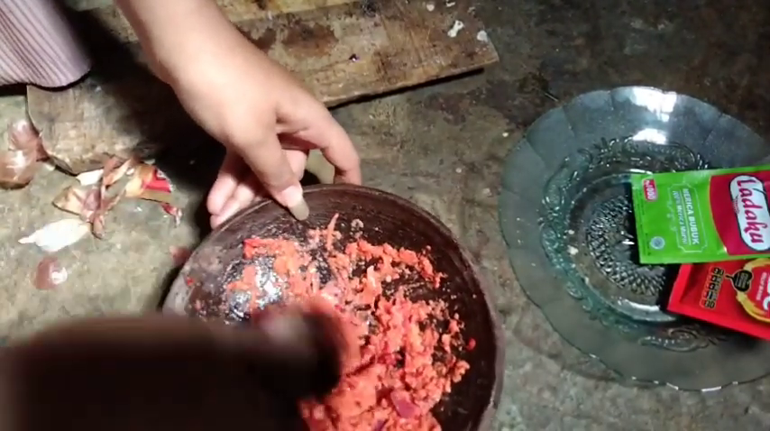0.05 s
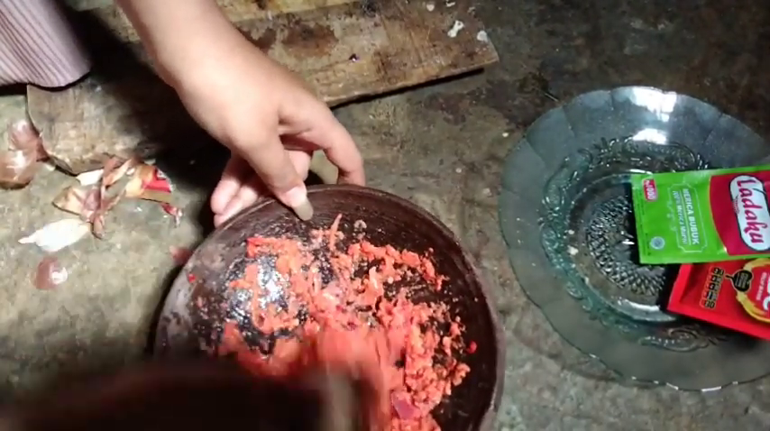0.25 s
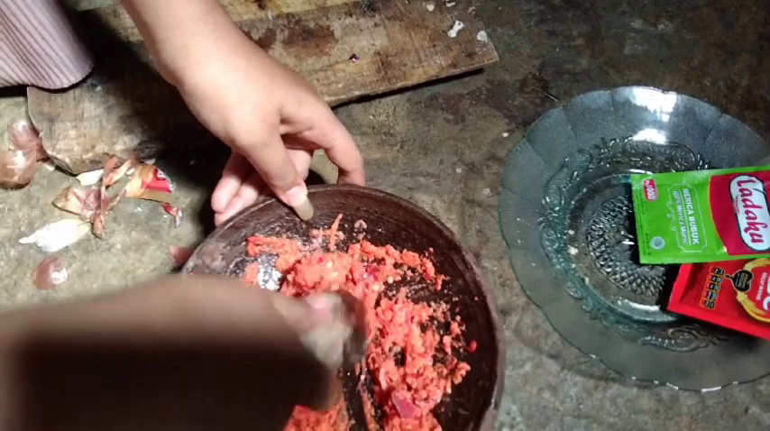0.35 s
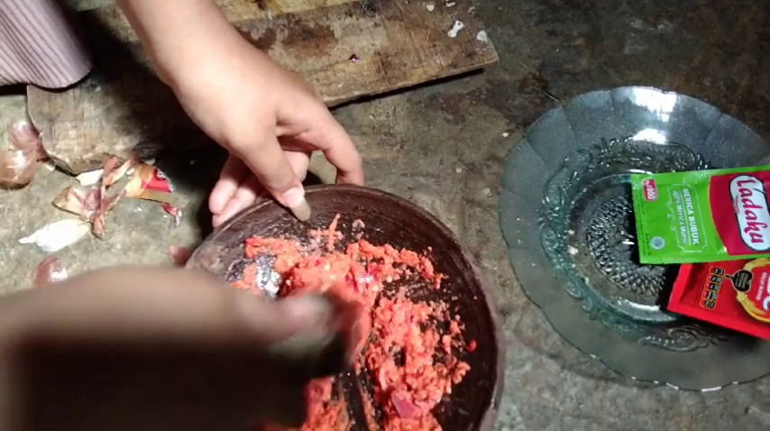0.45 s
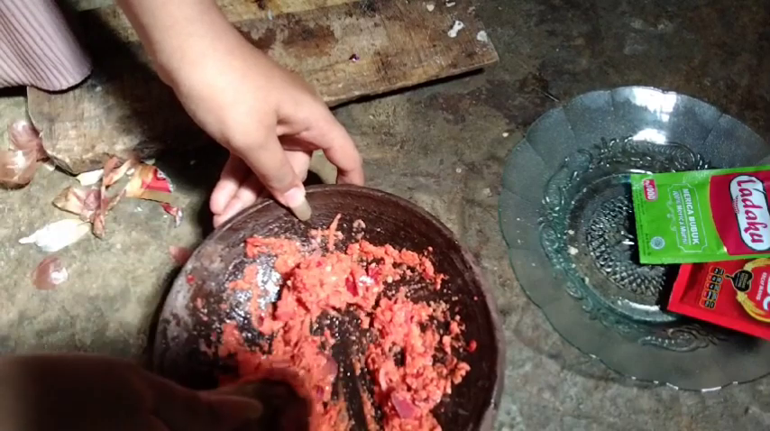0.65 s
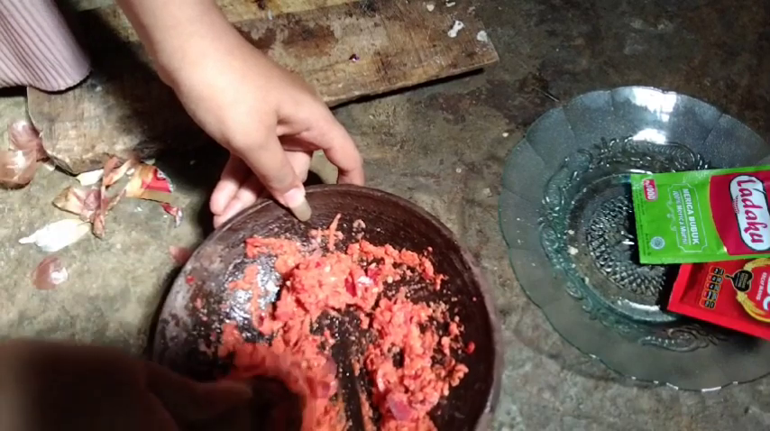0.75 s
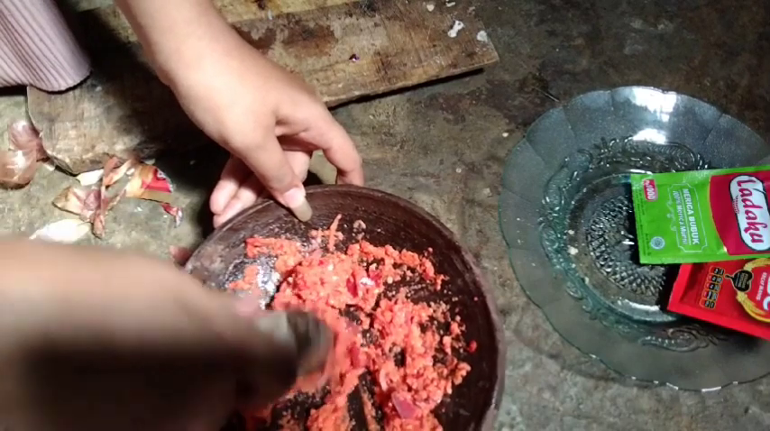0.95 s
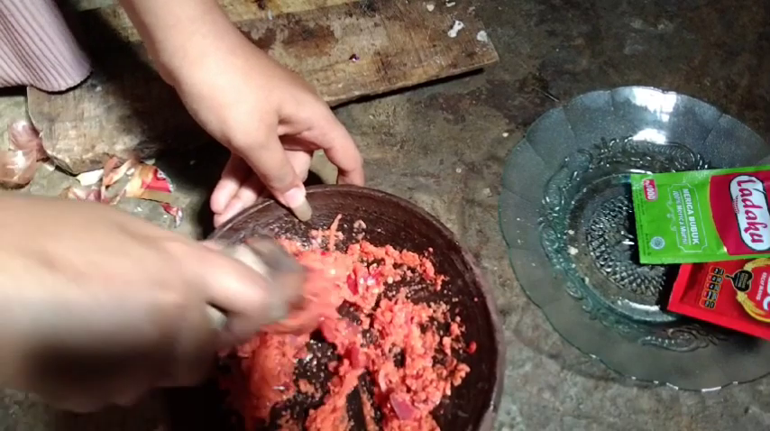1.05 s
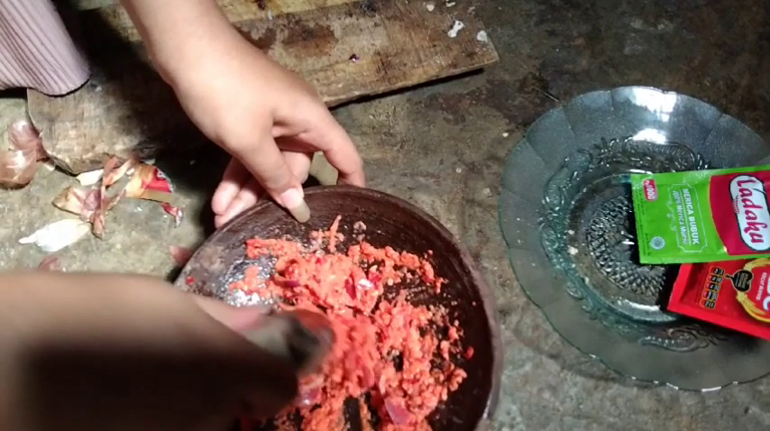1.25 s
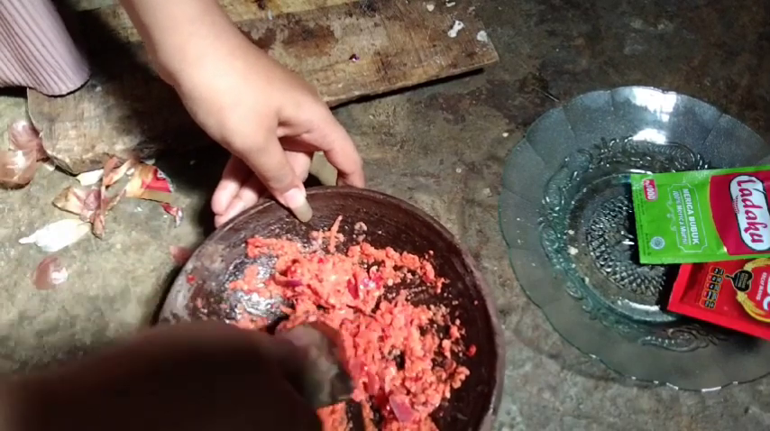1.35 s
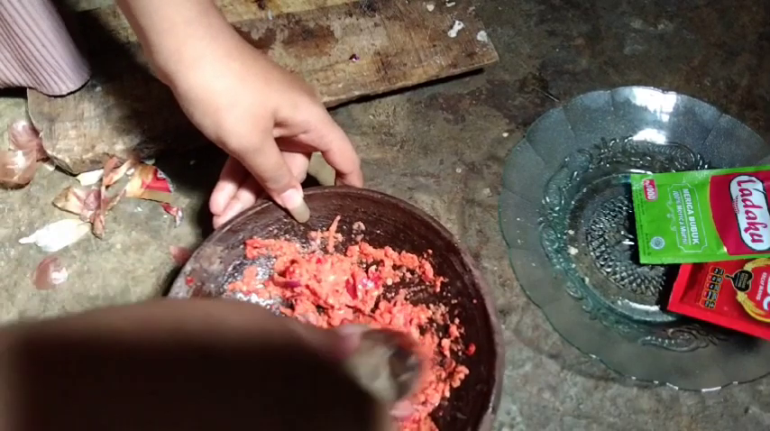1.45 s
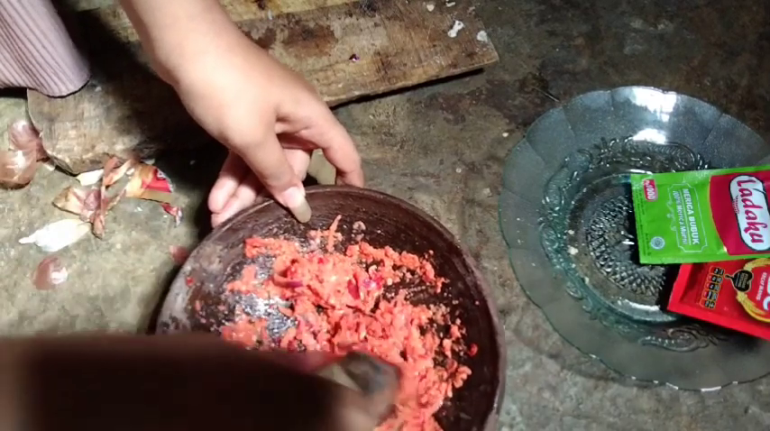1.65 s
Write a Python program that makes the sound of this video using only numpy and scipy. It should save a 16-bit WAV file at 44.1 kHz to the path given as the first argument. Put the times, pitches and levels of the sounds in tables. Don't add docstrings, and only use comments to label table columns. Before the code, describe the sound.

Stone pestle clacking, grinding and pounding in a mortar, close up, with short bare-room echoes

```python
import sys
import numpy as np
from scipy import signal
from scipy.fft import rfft, irfft, next_fast_len
from scipy.io import wavfile
from scipy.ndimage import uniform_filter1d, map_coordinates

SR = 44100
rng = np.random.default_rng(int(sys.argv[2]) if len(sys.argv) > 2 else 0)


def file_out(sig):
    cols = np.atleast_2d(sig).T
    lim = np.clip(cols, -1, 1)
    pcm = np.round(lim * 32767).astype(np.int16)
    wavfile.write(sys.argv[1], SR, pcm)


def ratio(d):
    e = np.asarray(d, float) / 20
    return 10 ** e


N = 74970


def unit(x):
    return x / np.sqrt(np.mean(x ** 2) + 1e-20)


def along(points, hz):
    point_hz, value = np.transpose(points)
    return np.interp(np.log(hz + 1), np.log(point_hz + 1), value)


def curves(rows):
    s, *columns = np.transpose(rows)
    return [np.interp(np.arange(N) / SR, s, column) for column in columns]


def filtered(x, response):
    size = next_fast_len(len(x) + 8192)
    return irfft(rfft(x, size) * response(np.fft.rfftfreq(size, 1 / SR)), size)[:len(x)]


def colored(x, colour):
    return unit(filtered(x, lambda f: ratio(along(colour, f))))


def body(peaks):
    return lambda f: sum(ratio(db) * (2j * f * width / (hz * hz - f * f + 2j * f * width)) ** 3
                         for hz, width, db in peaks)


def bands(peaks):
    poles = np.exp(1j * np.pi * np.array([[5], [7], [9], [11]]) / 8)
    return lambda f: sum(ratio(db) / np.prod(1j * (f * f - hz * hz) / ((f + 1) * width) - poles, axis=0)
                         for hz, width, db in peaks)


RING_RISE_S = 0.004


def ring(modes, db):
    t = np.arange(SR // 2) / SR
    scatter_db = 1.5 * rng.standard_normal(len(modes))
    turns = rng.random(len(modes))
    tones = np.zeros(len(t))
    for (hz, level_db, t60), own_db, turn in zip(modes, scatter_db, turns):
        tones += ratio(level_db + own_db - 60 * t / t60) * np.sin(2 * np.pi * (hz * t + turn))
    tones = tones * (1 - np.exp(-t / RING_RISE_S))
    return ratio(db) * tones / np.linalg.norm(tones)


# frequency in Hz, t60 in seconds.
WALLS = [(200, 0.31), (700, 0.43), (1500, 0.32), (3000, 0.3), (6000, 0.23), (12000, 0.19)]


def walls():
    gap_s, patch_db, bright_db_per_khz = 0.0017, 4.96, 0.208
    early_db, early_t60_s = -3, 0.05
    hz, t, noise = signal.stft(rng.standard_normal(SR // 2), SR, nperseg=128)
    hz = hz[:, None]
    patches = unit(uniform_filter1d(rng.standard_normal(noise.shape), size=5, axis=0))
    decay = ratio(-60 * t / along(WALLS, hz)) + ratio(early_db - 60 * t / early_t60_s)
    colour = ratio(patch_db * patches + bright_db_per_khz * hz / 1000)
    tail = signal.istft(noise * colour * decay, SR, nperseg=128)[1]
    return np.pad(tail / np.linalg.norm(tail), (round(gap_s * SR), 0))[:SR // 2]


def add(out, s, db, response, room_db, ringing=0):
    blow = ratio(room_db) * walls() + ringing
    blow[0] += 1
    piece = out[round(s * SR):][:len(blow)]
    piece += ratio(db) * filtered(blow, response)[:len(piece)]


def struck(blows, peaks, room_db, modes, ring_db):
    out = np.zeros(N)
    for s, db in blows:
        add(out, s, db, body(peaks), room_db, ring(modes, ring_db))
    return out


# frequency in Hz, level in dB per Hz.
AIR = [(25, -21), (170, -6), (560, -18), (850, -14.5), (1400, -16.5), (2000, -38), (8000, -38.5),
       (15800, -39.5)]
# time in seconds, gain in dB.
HUSH = [(0, 14), (.1, 3.5), (.2, -21), (.222, -29), (.228, 12), (1.7, 6)]


def air():
    hush_db, = curves(HUSH)
    return ratio(-75.5 + hush_db) * colored(rng.standard_normal(N), AIR)


# time in seconds, load in dB.
LOAD = [(0.0, -75), (0.022, -39), (0.212, -61.5), (0.246, -48), (0.284, -46), (0.378, -42), (0.426, -56.5),
        (0.762, -59), (0.794, -48.5), (1.112, -68), (1.144, -35.5), (1.386, -54.5), (1.4, -57),
        (1.486, -61), (1.534, -58), (1.594, -67), (1.624, -57.5), (1.7, -56.5)]
# frequency in Hz, width in Hz, level in dB.
FLOOR_BODY = [(100, 30, -8), (165, 22, 2), (218, 24, -3), (275, 24, -9), (332, 24, -8), (440, 50, -17)]


def floor_hum():
    load_db, = curves(LOAD)
    lumps = map_coordinates(rng.standard_normal(80), [np.arange(N) * 40 / SR])
    pushes = rng.standard_normal(N) * ratio(4 * lumps)
    return ratio(load_db - 11.5) * unit(filtered(pushes, body(FLOOR_BODY)))


# start in seconds, level in dB, frequency in Hz.
THUDS = [(0.018, 7.5, 205), (0.065, 3, 201), (0.102, -1.5, 221), (0.792, 1, 243), (0.889, -0.5, 221.4),
         (0.954, -2, 440), (1.025, -1, 274), (.325, 2, 186), (.35, 1, 269), (0.471, -1.5, 262),
         (1.201, -3, 148.2), (1.395, 0, 176.5), (1.51, -2.5, 173), (1.518, -3, 327.4), (1.545, -11, 324.6),
         (1.554, -5, 173), (1.618, -16, 172), (1.655, -15, 174)]


def thuds():
    out = np.zeros(N)
    for s, db, hz in THUDS:
        add(out, s, db, body([(hz, 22, 0)]), room_db=-10)
    return out


def settle():
    start_s, level_db, t60_s = 0.261, -36.5, 0.3
    from_hz, to_hz, glide_s = 760, 616, 0.042
    t = np.clip(np.arange(N) / SR - start_s, 0, None)
    cycles = to_hz * t + (from_hz - to_hz) * glide_s * (1 - np.exp(-t / glide_s))
    envelope = ratio(level_db - 60 * t / t60_s) * (1 - np.exp(-t / RING_RISE_S))
    return envelope * np.sin(2 * np.pi * cycles)


# start in seconds, peak in dB, frequency in Hz.
TICKS = [(.020, -46, 790), (0.019, -53, 2850), (0.03, -44, 1420), (0.2262, -25, 4700), (.412, -25.5, 1200),
         (.433, -57, 13500), (.459, -51.5, 14000), (.4705, -19.5, 3950), (0.777, -53, 12700),
         (.815, -56, 13000), (.835, -49, 2500), (0.839, -57, 14000), (0.968, -58, 10000), (.986, -43, 7000),
         (.986, -70, 12500), (1.013, -57, 12600), (1.02, -45, 3000), (1.027, -45, 7600),
         (1.031, -64, 12800), (1.051, -55, 3800), (1.082, -56, 2680), (1.083, -60, 6460),
         (1.088, -63, 14000), (1.003, -35.5, 6600), (1.003, -51, 13000), (1.015, -36, 6300),
         (1.023, -51.5, 13000), (1.026, -57, 12340), (1.103, -61.5, 12000), (1.127, -54.5, 7050),
         (1.1425, -30, 3830), (1.268, -42.5, 7400), (1.310, -24.5, 4320), (1.311, -27, 6700),
         (1.309, -41.5, 11600), (1.408, -44.5, 5630), (1.465, -45, 6700), (1.465, -48, 3834),
         (1.491, -65, 11720), (1.580, -38.5, 6820), (1.591, -40, 4800), (1.607, -41.5, 14000),
         (1.602, -31.5, 1960), (1.605, -32.5, 3070), (1.615, -40.5, 7390), (1.615, -47, 11200),
         (1.67, -58, 15040)]


def ticks():
    out = np.zeros(N)
    for s, db, hz in TICKS:
        add(out, s, db + 9, bands([(hz, hz / 3.2, 0)]), room_db=-3.5)
    return out


# start in seconds, level in dB.
ROCKS = [
    (0.2371, -32),
    (.2455, -29),
    (0.247, -9.5),
    (.2525, -31),
]
# frequency in Hz, width in Hz, level in dB.
ROCK_BODY = [(259, 280, 7.5), (686, 106, 27.5), (450, 60, 8), (1380, 57, 20), (1640, 250, 16),
             (2500, 580, 10), (7840, 5800, -17)]
# frequency in Hz, level in dB, t60 in seconds.
ROCK_MODES = [(415, -1, 0.17), (715.4, -6.5, 0.45), (751.5, 2, .1), (904, 0.5, .25), (1384, -12, .25)]


def rocks():
    return struck(ROCKS, ROCK_BODY, -7, ROCK_MODES, -23.5)


GRAIN_BANDS_HZ = 500 * 1.6 ** np.arange(8)


def grit():
    grains_per_s, spread_db, octaves = 200, 3.5, 0.45
    shape = (len(GRAIN_BANDS_HZ), N)
    hits = rng.random(shape) < grains_per_s / SR
    sizes = ratio(spread_db * rng.standard_normal(shape))
    trains = hits * sizes * np.sign(rng.standard_normal(shape))
    out = np.zeros(N)
    for train, hz in zip(trains, GRAIN_BANDS_HZ):
        out += filtered(train, lambda f: np.exp(-(np.log2((f + 1) / hz) / octaves) ** 2))
    return unit(out)


# time in seconds, pressure in dB, brightness in dB.
SCRAPE = [(0, -66.5, -26), (.1, -75.5, -7), (.218, -98.5, 8), (.226, -59, 8.5), (.3, -51.5, -9.5),
          (.36, -50.5, 0), (.46, -53, -39), (.48, -61.5, 2.5), (.6, -58, 3), (.82, -64, -12),
          (.87, -46.5, -4), (.93, -60.5, -2), (1.04, -65, -69.5), (1.14, -76, 12.5), (1.3, -60, -1.5),
          (1.57, -99, -3), (1.605, -73, 12), (1.7, -78, -12)]
# frequency in Hz, level in dB per Hz.
STONE = [(240, -33), (400, 1.5), (636, -6), (787, -14), (1280, 0), (1990, -8), (3290, 2), (4170, -8),
         (8000, -18), (10400, -53), (17600, -120)]
# frequency in Hz, level in dB per Hz.
FIZZ = [(3530, -16), (6000, -13.5), (8920, -24), (12600, -31.5), (14200, -27.5), (15800, -26.5)]


def scrape():
    pressure_db, bright_db = curves(SCRAPE)
    grains = grit()
    smooth = 1.1 * rng.standard_normal(N)
    room = unit(signal.fftconvolve(grains, walls())[:N])
    rub = unit(grains + smooth + room)
    return ratio(pressure_db) * (colored(rub, STONE) + ratio(bright_db - 1) * colored(rub, FIZZ))


# start in seconds, level in dB.
SKIDS = [(0.0198, -29), (0.2249, -26.5), (0.4706, -1), (0.4753, -5), (0.852, -21), (.858, -16),
         (0.868, -23), (0.881, -20), (.893, -34), (1.310, -18.5), (1.602, -33.5)]
# frequency in Hz, width in Hz, level in dB.
SKID_BODY = [(500, 1900, -12), (1480, 570, 2), (2484, 550, 8), (3000, 210, -1.5), (3950, 340, 3),
             (4900, 900, -18.5), (7300, 5100, -20.5), (10000, 4600, -32.5), (14000, 2800, -17.5)]


def skids():
    out = np.zeros(N)
    for s, db in SKIDS:
        add(out, s, db, body(SKID_BODY), room_db=-2.5)
    return out


# start in seconds, level in dB.
STRIKES = [
    (.3672, 8),
    (.3785, -0.5),
    (.3845, -5),
    (.4115, -6.5),
]
# frequency in Hz, width in Hz, level in dB.
STRIKE_BODY = [(246, 130, -12), (535, 156, -8), (926, 130, -2), (1390, 150, 4), (1644, 470, 4.5),
               (2500, 516, 5.5), (2840, 210, 6.5), (3515, 290, -5.5), (4660, 700, -13), (6160, 590, -18),
               (7430, 700, -18.5), (13000, 3400, -50.5)]
# frequency in Hz, level in dB, t60 in seconds.
STRIKE_MODES = [(845, -11.5, .2), (1200, -7.5, .12), (1335, -9, .09), (1860, -3, 0.11), (2121, -9.5, .15),
                (2509, -4.5, .12), (2642, -9.5, .15), (2676, 5, .14), (3008, -12, .11), (3365, -9, .2)]


def strikes():
    return struck(STRIKES, STRIKE_BODY, 0, STRIKE_MODES, -12)


# start in seconds, level in dB.
POUNDS = [
    (1.1448, -3.5),
    (1.1518, -19.5),
]
# frequency in Hz, width in Hz, level in dB.
POUND_BODY = [(200, 185, 8.5), (440, 85, 20), (866, 130, 17), (1066, 61, 22), (1420, 91, 17),
              (1673, 826, 19), (3834, 375, 15), (4800, 260, 13.5), (6100, 350, 6.5), (7400, 460, 3),
              (9230, 890, -4), (11800, 1800, -8), (14100, 2100, -9)]
# frequency in Hz, level in dB, t60 in seconds.
POUND_MODES = [(147.8, -4, 0.6), (221, -6, 0.02), (444, -19.5, 0.087), (710, 1.5, 0.37), (855, -6.5, 0.45),
               (1010, 2, .1), (1175, 10, .15), (1420, 2.5, .11), (1576, -16, 0.085), (1807, -3, 0.23),
               (2230, 8, .05)]


def pounds():
    return struck(POUNDS, POUND_BODY, -5.5, POUND_MODES, -18.5)


# start in seconds, peak in dB, ring in Hz, bowl in dB over ring, edge in dB over ring.
CLACKS = [(0.5186, -4, 3072, -19.5, -17.5), (0.618, -10.5, 2634, -12.5, -32.5),
          (0.6732, -12.5, 2880, -15, -21), (0.7035, -12.5, 3090, -19, -18.5),
          (0.7331, -20.5, 2780, -15, -30), (0.806, -41, 2830, 0, -24), (0.9451, -30.5, 2750, -7.5, -38),
          (0.9672, -32, 2900, -26, -23), (0.973, -36.5, 2490, -15, -26), (0.981, -36.5, 2520, -21, -23),
          (1.0600, -40.5, 2500, 0, -26), (1.067, -46, 2700, 3.5, -25)]
# frequency in Hz, level in dB, t60 in seconds.
BOWL_MODES = [(1003, 3.5, .1), (1280, -3, 0.23), (2450, -15.5, .12), (2816, -15, 0.35), (3030, -2, 0.16),
              (3090, -10, .25), (3216, -7.5, .22), (3340, -7, 0.29), (3623, -9, 0.3), (3710, -18, .12),
              (6780, -4.5, 0.19), (7070, -7.5, 0.22)]


def clacks():
    out = np.zeros(N)
    for s, db, hz, bowl_db, edge_db in CLACKS:
        clusters = [(hz, 1105, 0),
                    (2170, 500, -14),
                    (4700, 560, -22),
                    (1040, 524, bowl_db),
                    (6540, 1940, edge_db),
                    (9470, 2800, edge_db - 19.5),
                    (584, 750, bowl_db - 9)]
        add(out, s, db + 21.5, bands(clusters), -3, ring(BOWL_MODES, -13))
    return out


def scene():
    background = air() + floor_hum() + thuds() + settle()
    paste_and_rub = ticks() + rocks() + scrape() + skids()
    blows = strikes() + pounds() + clacks()
    return (background + paste_and_rub + blows)[None]


def band_limit(x):
    return signal.sosfilt(signal.butter(12, 16510, fs=SR, output="sos"), x)


def record(dry):
    mix = filtered(dry[0], lambda f: 1 / (1 + (f / 15700) ** 90))[None]
    return band_limit(mix)


dry = scene()
out = record(dry)
file_out(out)
```